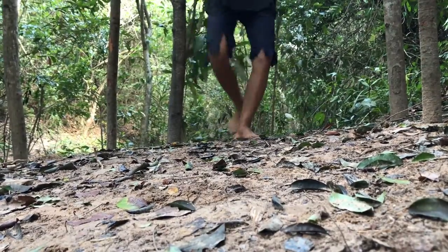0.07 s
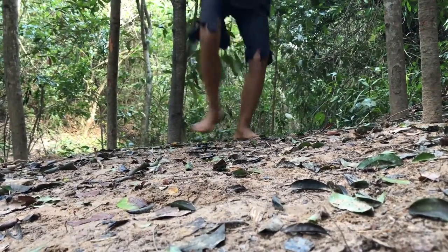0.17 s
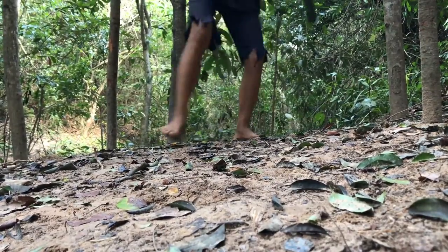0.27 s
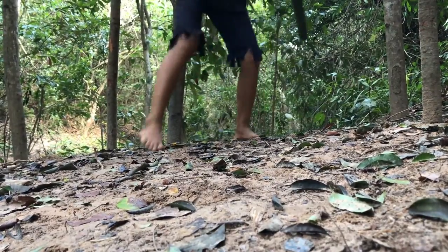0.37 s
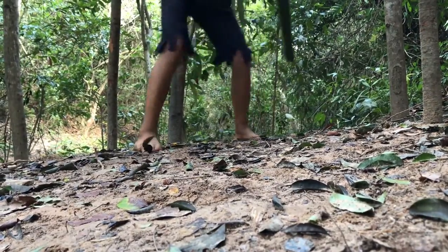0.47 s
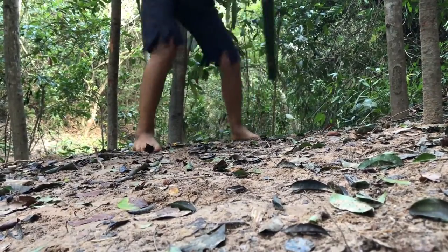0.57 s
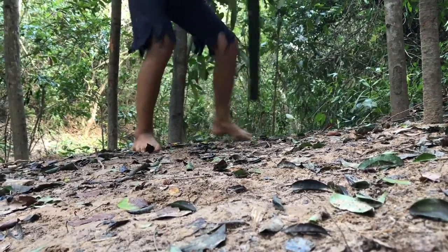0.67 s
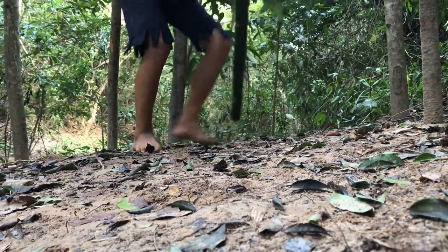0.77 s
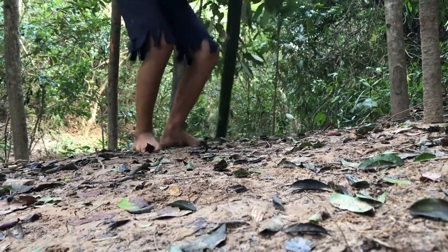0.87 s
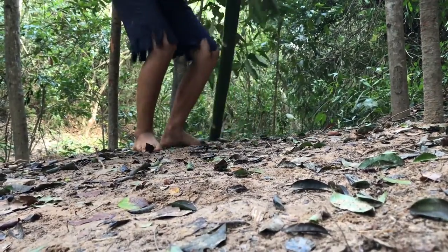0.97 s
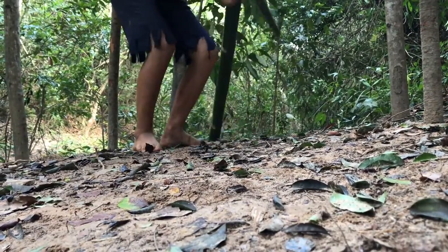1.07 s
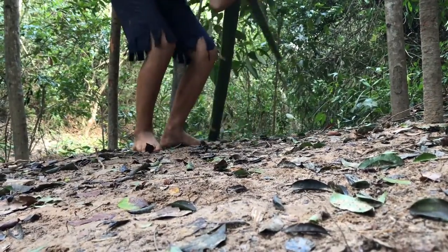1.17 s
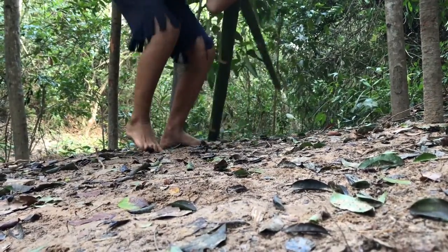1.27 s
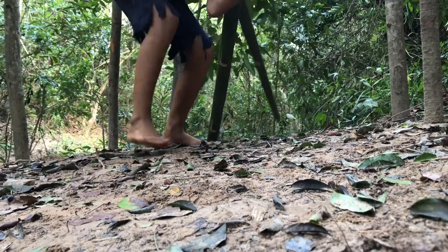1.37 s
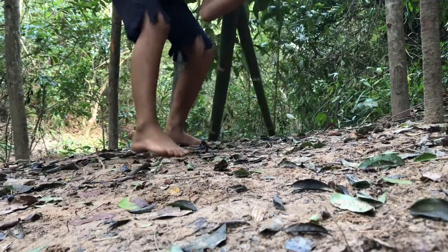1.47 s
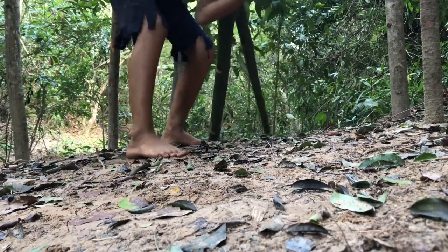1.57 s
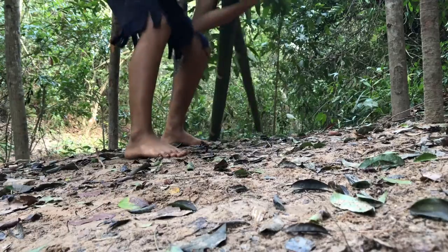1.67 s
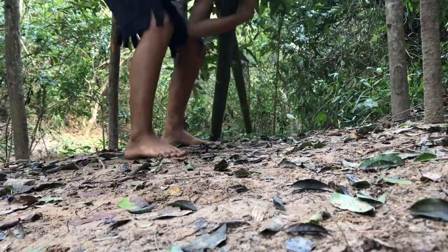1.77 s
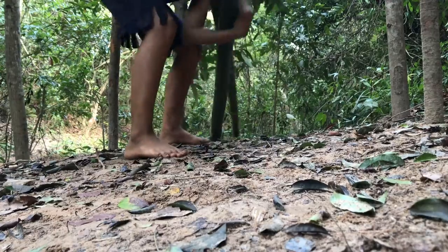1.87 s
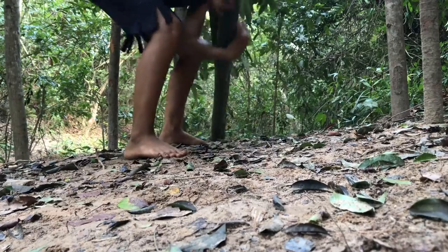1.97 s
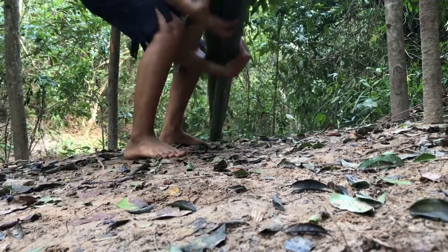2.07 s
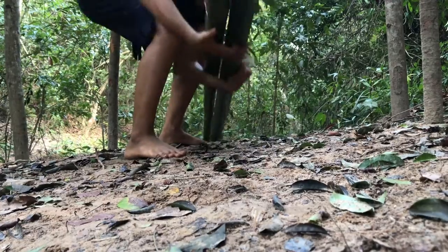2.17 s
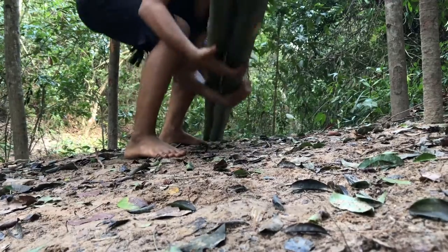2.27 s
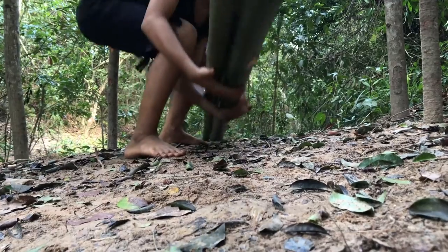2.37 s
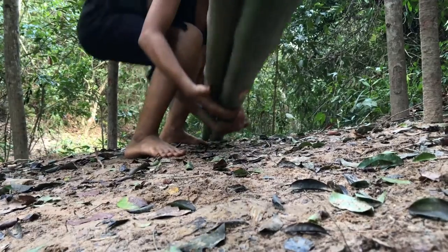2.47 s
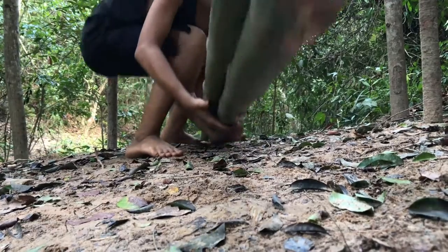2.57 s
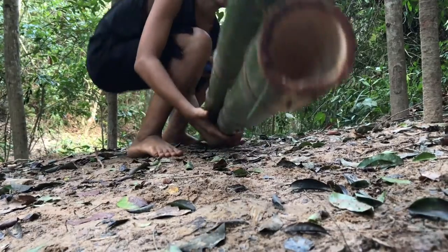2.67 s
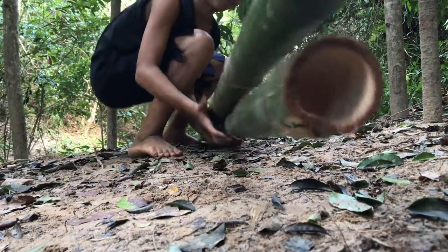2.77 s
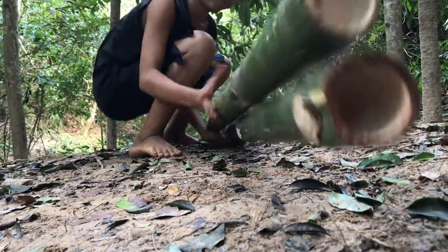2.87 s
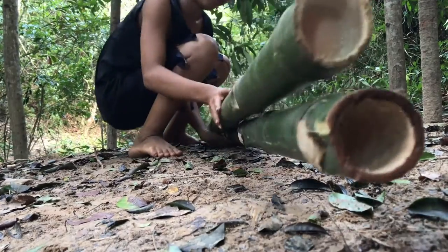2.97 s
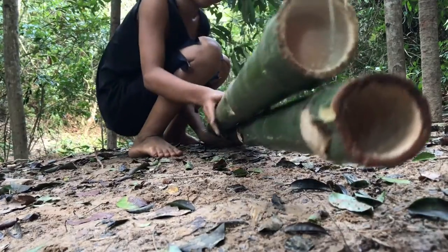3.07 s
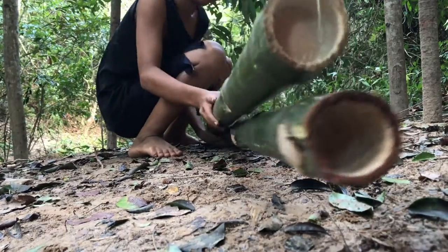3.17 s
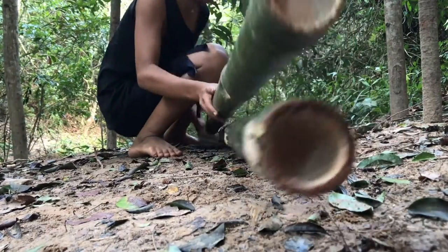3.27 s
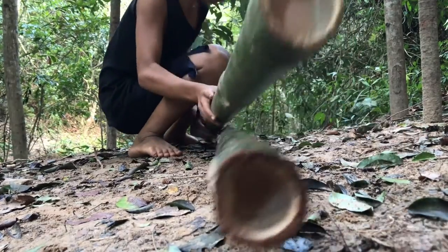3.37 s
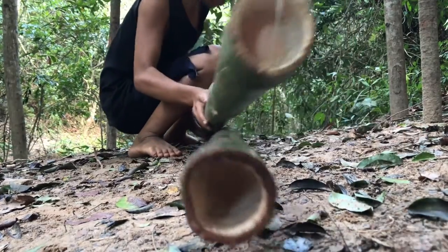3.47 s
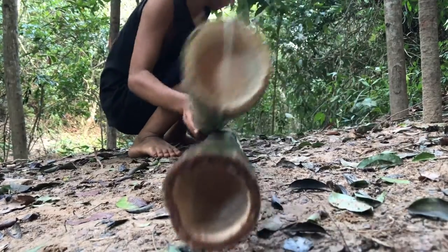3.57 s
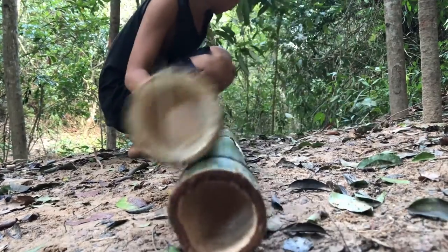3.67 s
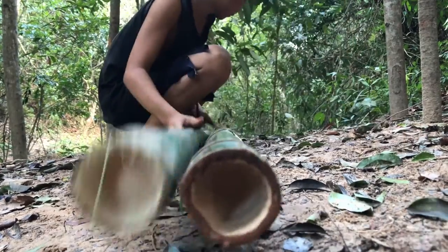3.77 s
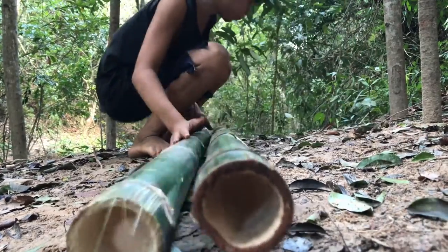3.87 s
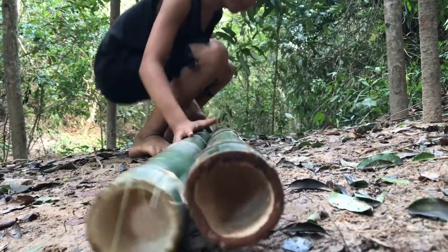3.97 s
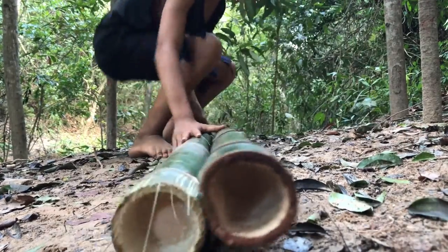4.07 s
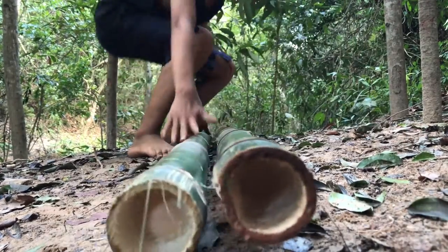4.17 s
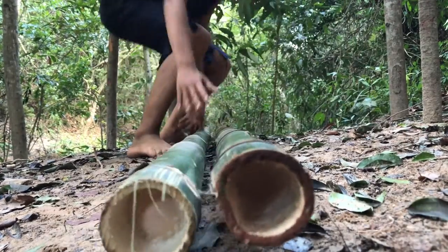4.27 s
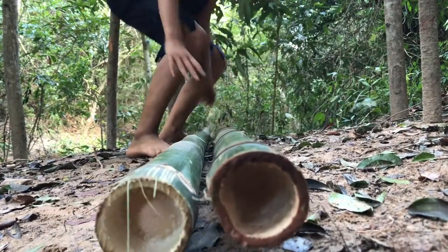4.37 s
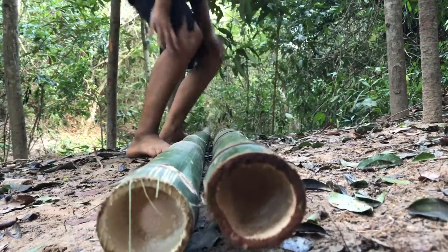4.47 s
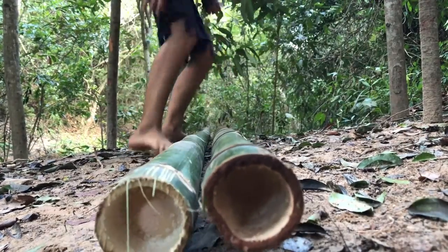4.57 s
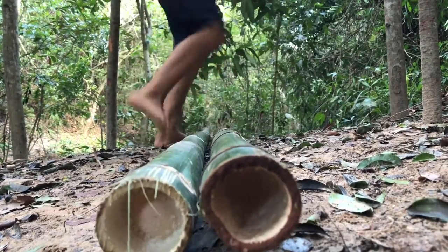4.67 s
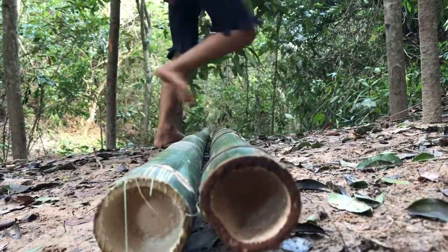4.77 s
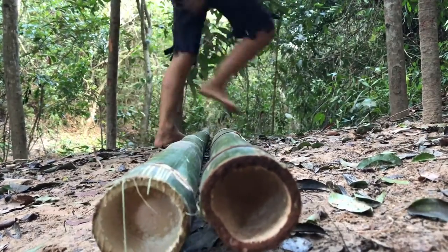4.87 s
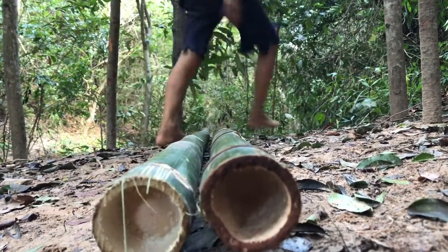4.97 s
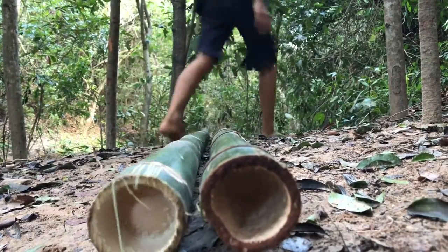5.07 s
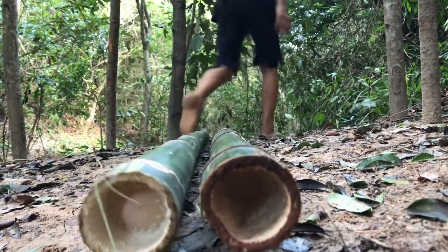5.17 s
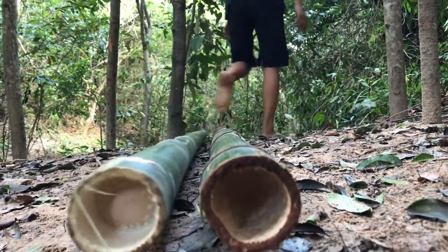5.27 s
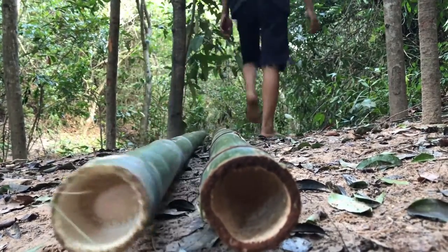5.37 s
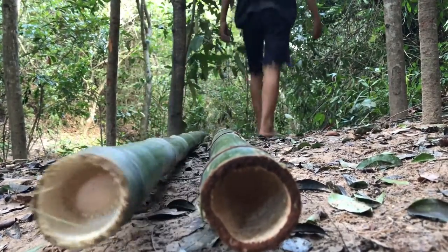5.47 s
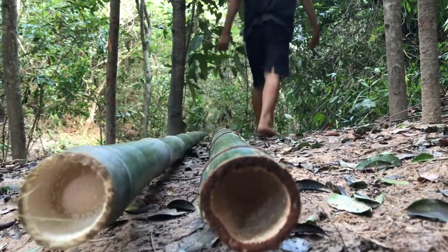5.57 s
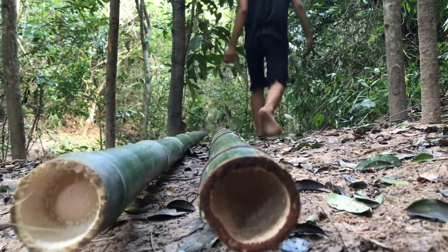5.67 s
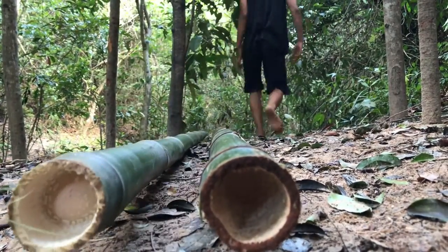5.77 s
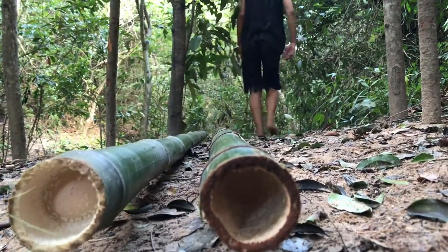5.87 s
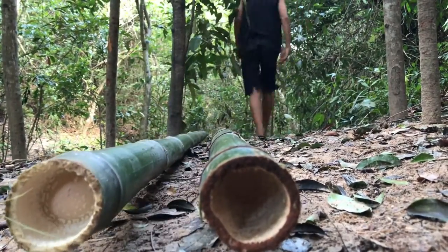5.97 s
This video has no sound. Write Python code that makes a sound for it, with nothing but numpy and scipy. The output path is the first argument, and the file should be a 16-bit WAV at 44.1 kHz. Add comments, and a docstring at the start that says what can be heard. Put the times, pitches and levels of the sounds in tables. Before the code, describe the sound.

Barefoot steps in dry leaves, two sharp ringing bamboo clacks, a deep hollow boom, then softer knocks as the poles are laid down outdoors.

```python
"""Leafy forest ground: two thick green bamboo poles are gathered and laid down, close by.
They clack, boom hollowly and settle with lighter knocks, as modal resonators with a humming open mouth.
Rolls are runs of small contacts on the same modes; skins slip with dry ticks, made of noise cracks.
Bare feet thud as damped low tones or low noise and shuffle, with leaves that crackle and snap.
Filtered noise gives a low rumble of air and a steady high hiss."""
import sys
import numpy as np
from scipy import signal
from scipy.fft import rfft, irfft, next_fast_len
from scipy.io import wavfile
from scipy.ndimage import uniform_filter1d

SR = 44100
rng = np.random.default_rng(int(sys.argv[2]) if len(sys.argv) > 2 else 0)


def materialize(psi):
    """Save the field psi as 16-bit PCM at rate SR to the path in sys.argv[1].

    A 1-D psi becomes a single channel; in a 2-D psi each row is a channel.
    """
    bounded = np.clip(np.atleast_2d(psi).T, -1, 1)
    quanta = np.round(bounded * 32767).astype(np.int16)
    wavfile.write(sys.argv[1], SR, quanta)


N = 265129
TIME = np.arange(N) / SR
AGE = np.arange(SR // 2) / SR   # time since the onset of a single sound [s]
CUTOFF_HZ = 15700
ON_WALL, ON_SOIL = 0, 1   # where a pole is struck


def from_db(db):
    """Decibel law: level to amplitude gain."""
    return 10 ** (np.asarray(db) / 20)


def rms_one(x):
    """Power normalisation: scale to unit rms."""
    return x / np.sqrt(np.mean(x ** 2) + 1e-20)


def in_time(rows):
    """Linear interpolation: each column of a curve at every sample."""
    s, *columns = np.transpose(rows)
    return [np.interp(TIME, s, column) for column in columns]


def add(track, s, sound):
    """Superposition: mix a sound in from second s."""
    at = max(round(s * SR), 0)
    track[at:at + len(sound)] += sound[:N - at]


def fade(t60):
    """Exponential decay: 60 dB of loss in t60 seconds."""
    return from_db(-60 * AGE / t60)


def ring(hz, t60):
    """Damped oscillator: one struck mode."""
    return np.sin(2 * np.pi * hz * AGE) * fade(t60)


def band(x, low, high, order=3):
    """Causal Butterworth band-pass."""
    sos = signal.butter(order, [low, min(high, .45 * SR)], "band", fs=SR, output="sos")
    return signal.sosfilt(sos, x + 1e-18)


def log_bins(size):
    """Logarithmic frequency axis of a real spectrum."""
    return np.log(np.arange(size // 2 + 1) * SR / size + 1)


def coloured(x, spectrum):
    """Spectral shaping: multiply a steady sound by a spectrum; rms 1."""
    hz, db = np.transpose(spectrum)
    size = next_fast_len(N)
    curve_db = np.interp(log_bins(size), np.log(hz), db, left=-80, right=-80)
    return rms_one(irfft(rfft(x, size) * from_db(curve_db), size)[:N])


def drift(rate, time=TIME):
    """Random modulation: straight lines between normal knots, rate of them per second."""
    knots = rng.standard_normal(4000)
    return np.interp(time * rate, np.arange(len(knots)), knots)


def burst(t60):
    """Decaying noise of unit energy."""
    noise = rng.standard_normal(len(AGE)) * fade(t60)
    return noise / np.linalg.norm(noise)


def crackle(per_s, clump_db, size_db=0.5):
    """Random impulse process: tiny cracks, slightly uneven in size, stronger and weaker in clumps."""
    sizes = rng.choice([-1, 1], N) * from_db(size_db * np.minimum(rng.exponential(1, N), 5))
    return (rng.random(N) < per_s / SR) * sizes * from_db(clump_db * drift(90))


# Spectrum of the air rumble, before its low cut: (frequency [Hz], relative level [dB])
AIR_SPECTRUM = [(25, -12), (38, -6), (59, 4), (133, -5.5), (253, -13), (435, -20), (981, -24.5),
                (7570, -42.5), (9000, -32.5), (11700, -39), (19800, -120)]
# Spectrum of the high hiss: (frequency [Hz], relative level [dB])
HISS_SPECTRUM = [(8000, -19), (10400, -11), (11400, 3), (13200, 7.5), (14300, 2), (15200, -13),
                 (16000, -31)]


def background(air_db=-50.5, hiss_db=-60, swell_db=0.5, low_cut_hz=38):
    """Stationary noise: gently swelling air under an even high hiss."""
    air = coloured(rng.standard_normal(N), AIR_SPECTRUM)
    air = band(air, low_cut_hz, CUTOFF_HZ, order=2) * from_db(swell_db * drift(9))
    hiss = coloured(rng.standard_normal(N), HISS_SPECTRUM)
    return from_db(air_db) * air + from_db(hiss_db) * hiss


def scraping(full_scale_db=-31.5, follows=0.85, rise_s=0.035, t60=0.33):
    """Sliding friction: strength of the scrape after each contact, as the pole grinds to rest."""
    power = np.zeros(N)
    for s, db, *_ in contacts():
        # the scrape follows only a share of the blow's decibels
        strength = from_db(full_scale_db + follows * db) * fade(t60) * (1 - fade(rise_s))
        add(power, s, strength ** 2)
    return np.sqrt(power)


# Strength of shuffling, before trims: (time [s], rubbing level [dB], leaf level [dB])
SHUFFLE_CURVE = [(0.0, -55, -55), (1.52, -59, -61.5), (1.64, -56, -55), (2.09, -59.5, -59),
                 (2.49, -56.5, -63), (3.23, -53, -60.5), (3.53, -55, -67), (3.99, -53, -55),
                 (4.29, -67, -67.5), (5.82, -58.5, -64.5), (6.0, -57, -66)]
# Spectrum of rubbing on soil: (frequency [Hz], relative level [dB])
RUB_SPECTRUM = [(150, 6), (300, 1.5), (550, 1.5), (1100, -4.5), (1800, -6), (3000, -12), (6000, -26)]
# Spectrum of stirred leaves: (frequency [Hz], relative level [dB])
LEAF_SPECTRUM = [(900, 8.5), (1800, -6.5), (3300, 1.5), (5000, -3.5), (7000, -3.5), (10000, -11.5),
                 (15000, -1)]


def shuffle(rub_trim_db=-3, leaf_trim_db=-2, uneven_db=5.0, stirred_db=-16):
    """Friction noise: feet and pole ends rub over the soil and stir the litter."""
    rub_db, leaf_db = in_time(SHUFFLE_CURVE)
    scrape = scraping()
    leaves = coloured(crackle(per_s=5600, clump_db=2.0), LEAF_SPECTRUM)
    soil = coloured(rng.standard_normal(N) * from_db(uneven_db * drift(45)), RUB_SPECTRUM)
    # independent sources add in power
    leaf_gain = np.hypot(from_db(leaf_db + leaf_trim_db), from_db(stirred_db) * scrape)
    rub_gain = np.hypot(from_db(rub_db + rub_trim_db), scrape)
    return leaf_gain * leaves + rub_gain * soil


def crack_runs(rows, trim_db=-7.0, rise_s=0.0012, ragged_db=0.5, width=1.48, cracks_per_s=2500):
    """Random impulse excitation: short, ragged runs of tiny cracks, each band-passed around its own pitch."""
    out = np.zeros(N)
    for s, db, hz, t60 in rows:
        cracks = rng.random(len(AGE)) < cracks_per_s / SR
        run = cracks * burst(t60) * from_db(ragged_db * drift(500, AGE)) * (1 - fade(rise_s))
        sound = band(run, hz / width, hz * width, order=2)
        peak = np.sqrt(uniform_filter1d(sound ** 2, size=88).max())   # over 2 ms
        add(out, s, from_db(db + trim_db) * sound / peak)
    return out


# Leaf and twig snaps, with a low foot thud at 0.123 s and a low footfall knock at 5.912 s:
# (time [s], level before trim [dB], pitch [Hz], t60 [s])
SNAPS_AND_STEPS = [(0.018, -40.5, 6000, 0.36), (0.123, -37.5, 443, .05), (0.7116, -39.5, 4340, 0.051),
                   (0.867, -38.5, 2900, 0.1), (0.9113, -37.5, 1830, 0.032), (0.985, -30.5, 1420, 0.089),
                   (1.007, -41, 2700, 0.06), (5.75, -45.5, 2860, 0.044), (5.912, -42, 620, 0.13),
                   (5.915, -42.5, 3320, 0.066)]


def snaps_and_steps():
    """Band-limited impulse noise: high runs snap as leaves and twigs, two low ones knock as footfalls."""
    return crack_runs(SNAPS_AND_STEPS)


# A foot or a pole pushes through the leaves: (middle time [s], level [dB], half length [s])
LEAF_PUSHES = [(.46, -62, 0.1), (1.015, -45.5, 0.013), (1.223, -55.5, 0.055), (1.57, -53.5, 0.036),
               (2.295, -52.5, 0.0082), (2.87, -55, 0.1), (3.329, -52, 0.047), (5.148, -54, 0.023)]
# Spectrum of crushed leaves: (frequency [Hz], relative level [dB])
CRUNCH_SPECTRUM = [(800, 5), (1400, 4), (3200, 6), (5000, -1), (8000, -2.5), (11000, -3.5), (13500, 4),
                   (15500, -7)]


def rustles(crush_db=-25, crush_s=0.029):
    """Crushing under pressure: each push into the leaves, or pole landing on them, swells and dies away."""
    # a landing crushes leaves at crush_db against its own level
    crushes = [(s, db + crush_db, crush_s) for s, db, _, _ in LANDING_BLOWS]
    pushes = list(LEAF_PUSHES) + crushes
    pressure = sum(from_db(db) * np.exp(-.5 * ((TIME - s) / half) ** 2) for s, db, half in pushes)
    return pressure * coloured(crackle(per_s=2000, clump_db=3.5), CRUNCH_SPECTRUM)


# Dull thumps on the soil: (time [s], level before the slow onset [dB], frequency [Hz], t60 [s])
SOIL_THUMPS = [(0.922, -18.5, 94, 0.054), (1.219, -37.5, 76.4, 0.12), (1.646, -38, 86.5, 0.24),
               (3.907, -31, 84, 0.13)]


def thumps(rise_s=0.014):
    """Heavily damped oscillation: soft soil yields slowly and soon stops swinging."""
    out = np.zeros(N)
    for s, db, hz, t60 in SOIL_THUMPS:
        add(out, s, from_db(db) * ring(hz, t60) * (1 - fade(rise_s)))
    return out


# Echoes off the ground and trunks: (delay [s], level [dB])
ECHO_PATHS = [(.0063, -22.5), (.0098, -17), (0.0198, -20)]


def forest(x, low_db=-10, low_t60=0.17, high_db=-15.0, high_t60=0.26, split_hz=1700, build_s=0.0044):
    """Reflection and scattering: direct sound, dull echoes, dull scatter and a longer broadband tail."""
    paths = np.zeros(len(AGE))
    for delay, db in ECHO_PATHS:
        add(paths, delay, from_db([db]))
    scatter = from_db(low_db) * burst(low_t60) * (1 - fade(build_s))
    paths = band(paths + scatter, 53, split_hz, order=2)
    paths += from_db(high_db) * burst(high_t60)
    return x + signal.fftconvolve(x, paths)[:len(x)]


# Air chambers and wall of a pole, before chance variation:
# (frequency [Hz], level struck on the wall [dB], level set on the soil [dB], t60 [s])
POLE_MODES = [(176.3, -20.5, -14, .33), (282, -12.5, -11, 0.21), (375, -12, -8.5, 0.25),
              (489.4, 1, -9, .21), (515, -3, 4, 0.061), (572, -6.5, -6, 0.19), (732, -7.5, -15.5, .12),
              (824, -41, -12.5, 0.079), (927, -20, -21, 0.2), (1020, -17.5, -10.5, 0.17),
              (1094, -15, -15.5, 0.094), (1181, -25, -24, 0.1), (1321, -12.5, -12, 0.11),
              (1380, -17, -18, 0.057), (1538, -8.5, -29, 0.059), (1966, -16, -11.5, 0.095)]


def pole_modes(place, vary_db=1.5, detune=0.0081, flutter_db=3.5, flutter_per_s=110):
    """Modal superposition: place and grip set the mode strengths; the ring flutters as the pole rocks."""
    strengths, shifts = rng.standard_normal((2, len(POLE_MODES)))
    modes = np.zeros(len(AGE))
    for (hz, *levels_db, t60), own, shift in zip(POLE_MODES, strengths, shifts):
        # the grip detunes mostly the higher modes, those of the wall
        shifted_hz = hz * (1 + detune * shift * min(hz / 1000, 2) ** 2)
        modes += from_db(levels_db[place] + vary_db * own) * ring(shifted_hz, t60)
    return modes * from_db(flutter_db * drift(flutter_per_s, AGE))


# Edges of the thud, hollow, wall, clack and tick registers: frequency [Hz]
REGISTER_EDGES = [120, 330, 680, 1900, 4800, 15000]


def weighted(x, levels_db):
    """Minimum-phase equalisation: bring each register of a blow toward its level."""
    edges, size = np.array(REGISTER_EDGES), len(x)
    power = []
    for low, high in zip(edges, edges[1:]):
        onset = band(x[:size // 8], low, high, order=2)
        power.append(uniform_filter1d(onset ** 2, size=441).max())   # over 10 ms
    centres = np.sqrt(edges[:-1] * edges[1:])
    gain_db = np.interp(log_bins(size), np.log(centres), levels_db - 10 * np.log10(power))
    cepstrum = irfft(np.log(from_db(gain_db)), size)
    # fold the cepstrum onto its causal half: nothing sounds before the contact
    cepstrum[1:] *= 2
    cepstrum[size // 2:] = 0
    return irfft(rfft(x) * np.exp(rfft(cepstrum)), size)


# Broad resonances of the hard skin, before register weights: (frequency [Hz], level [dB], t60 [s])
SKIN_MODES = [(2980, 1.5, 0.0026), (3770, 1.5, 0.0026), (6800, 7, 0.0018), (12500, -22, 0.0012)]


def knock(levels_db, spot_hz, place, ring_db, spot_db=1, spot_t60=0.017, crack_db=17, crack_t60=0.017,
          fibre_db=19, fibre_t60=0.041, fibre_hz=2800, lowest_hz=130):
    """Impact excitation: modes, struck spot and a brief crack, weighted by register for the contact."""
    body = from_db(ring_db) * pole_modes(place) + from_db(spot_db) * ring(spot_hz, spot_t60)
    body += sum(from_db(db) * ring(hz, t60) for hz, db, t60 in SKIN_MODES)
    body += from_db(crack_db) * burst(crack_t60)
    # the wall's many damped modes blur into a short noise
    body += from_db(fibre_db) * band(burst(fibre_t60), 150, fibre_hz, order=1)
    return weighted(band(forest(body), lowest_hz, REGISTER_EDGES[-1]), levels_db)


def unfold(blows, place, stages):
    """Multiple impact: each blow as contacts (s, dB, register weights dB, spot Hz, place struck)."""
    from_wall = np.arange(-2, 3)   # registers below or above the wall register
    return [(s + delay, db + change, np.array(weights) + brightness * from_wall, spot_hz, place)
            for s, db, brightness, spot_hz in blows for (delay, change), weights in stages]


# Stages of a blow: (delay [s], level against the blow [dB])
FIRST = (0, 0)
GRAZE = (-.0035, -17)   # a light blow grazes just before it seats

# Weight of a rap in the thud, hollow, wall, clack and tick registers: level against the peak [dB]
RAP_WEIGHTS = (-8.5, -19, -3, -14, -25)
# A pole glances off the other, or off a twig as it rolls, before register trims:
# (time [s], level [dB], brightness [dB per register], struck spot [Hz])
RAP_BLOWS = [(1.29, -40.5, 3, 1110), (1.473, -34, -1.5, 980), (1.525, -25.5, 0.5, 1310),
             (1.563, -29, 0.5, 1170), (1.742, -29, -1, 980), (1.841, -39, -3.5, 1300),
             (2.254, -27.5, -3, 574), (2.791, -25, -0.5, 1660), (5.142, -40.5, 0, 1260)]


def raps():
    """Glancing impact: a rap grazes, seats, then slips and catches again."""
    chatter = (0.0065, -13.5)
    return unfold(RAP_BLOWS, ON_WALL, [(GRAZE, RAP_WEIGHTS), (FIRST, RAP_WEIGHTS), (chatter, RAP_WEIGHTS)])


# Weights of the clack and of the wall swing in the five registers: level against the peak [dB]
CLACK_WEIGHTS = (-22, -29, -17.5, -12, -15.5)
SWING_WEIGHTS = (-19.5, -15, -1.5, -17.5, -43)
# The upright poles swing hard into each other, before register trims:
# (time [s], level [dB], brightness [dB per register], struck spot [Hz])
CLASH_BLOWS = [(1.642, -7.5, 0.5, 1063), (1.7107, -9, 0, 1200)]


def clashes():
    """Hard collision: after the clack the walls swing out, and the poles touch once more."""
    wall_swing, rattle = (.006, -7), (.023, -16)
    stages = [(FIRST, CLACK_WEIGHTS), (wall_swing, SWING_WEIGHTS), (rattle, RAP_WEIGHTS)]
    return unfold(CLASH_BLOWS, ON_WALL, stages)


# Weights of soil contact, boom and rebound in the five registers: level against the peak [dB]
SOIL_WEIGHTS = (-5, -9.5, -5, -22.5, -29.5)
BOOM_WEIGHTS = (-18.5, -2.5, -11.5, -23.5, -54)
REBOUND_WEIGHTS = (-16.5, -32, -9.5, -31.5, -45)
# The butt of a pole is set down and its chambers boom, before register trims:
# (time [s], level [dB], brightness [dB per register], struck spot [Hz])
BOOM_BLOWS = [(2.074, -7.5, 1, 953), (2.336, -21, 0, 984)]


def booms():
    """Cavity resonance: the butt meets leaf litter, then firm soil, and bounces once."""
    cushion, bounce = (-0.0049, -20.5), (.0125, -1.4)
    stages = [(cushion, SOIL_WEIGHTS), (FIRST, BOOM_WEIGHTS), (bounce, REBOUND_WEIGHTS)]
    return unfold(BOOM_BLOWS, ON_SOIL, stages)


# A pole drops along its length and settles, before register trims:
# (time [s], level [dB], brightness [dB per register], struck spot [Hz])
LANDING_BLOWS = [(3.48, -34.5, 3.5, 960), (3.745, -28, 1.5, 580), (3.946, -29.5, -3, 1050),
                 (4.093, -26.5, -1, 920)]


def landings():
    """Damped impact: a dropped pole grazes, lands and rocks down onto its other end."""
    settle = (.015, -9)
    return unfold(LANDING_BLOWS, ON_SOIL, [(GRAZE, SOIL_WEIGHTS), (FIRST, SOIL_WEIGHTS), (settle, SOIL_WEIGHTS)])


# Weight of a click in the five registers: level against the peak [dB]
CLICK_WEIGHTS = (-50, -50, -12, -2.5, -15.5)
# The lying poles click together, skin on skin, before register trims:
# (time [s], level [dB], brightness [dB per register], struck spot [Hz])
CLICK_BLOWS = [(3.890, -22, 0, 1006)]


def clicks():
    """Stiff contact: skin grazes skin, then seats."""
    return unfold(CLICK_BLOWS, ON_WALL, [(GRAZE, CLICK_WEIGHTS), (FIRST, CLICK_WEIGHTS)])


def contacts():
    """Superposition of impacts: the contacts of every kind of blow."""
    return raps() + clashes() + booms() + landings() + clicks()


# As the poles come down their open mouths hum more strongly; the wall's ring varies from blow to blow:
# (time [s], mouth level against the hollow register [dB], modal ring level [dB], mouth frequency [Hz])
LOWERING_CURVE = [(1.72, -34, -5.5, 378), (2.34, -45, -17, 379.6), (2.8, -5, -10.5, 368),
                  (3.6, -16, 8, 374), (3.76, -4.5, -8, 384), (3.95, -8, -13, 382),
                  (4.1, -5.5, -12.5, 371.5)]


def poles(register_trim_db=(-2, -.2, -1.6, -2.2, -2.5), mouth_t60=0.52, waver_db=5.0, waver_per_s=45):
    """Coupled resonators: every knock also sets the air in the open end into a wavering hum."""
    out = np.zeros(N)
    mouth_db, ring_db, mouth_hz = in_time(LOWERING_CURVE)
    for s, db, weights, spot_hz, place in contacts():
        at = round(s * SR)
        add(out, s, knock(db + weights + register_trim_db, spot_hz, place, ring_db[at]))
        waver = from_db(waver_db * drift(waver_per_s, AGE))
        hum = ring(mouth_hz[at], mouth_t60) * waver
        add(out, s, from_db(db + weights[1] + mouth_db[at]) * hum)   # weights[1]: hollow register
    return out


# Thin pings: (time [s], level [dB], frequency [Hz], t60 [s])
THIN_PINGS = [(1.291, -41, 3410, 0.033), (3.082, -45, 2640, 0.033)]


def pings():
    """Single-mode decay: a thin, short ring."""
    out = np.zeros(N)
    for s, db, hz, t60 in THIN_PINGS:
        add(out, s, from_db(db) * ring(hz, t60))
    return out


# Skin slips on skin with a dry tick: (time [s], level before trim [dB], pitch [Hz], t60 [s])
SKIN_SLIPS = [(1.669, -32, 3900, 0.023), (1.7195, -23, 3540, 0.0093), (1.731, -33, 3900, 0.015),
              (1.769, -37, 2810, 0.05), (1.84, -38, 3480, 0.011), (2.196, -42, 3480, 0.075),
              (2.214, -45, 5500, 0.033), (2.234, -43, 5300, 0.027), (2.25, -35, 3980, 0.053),
              (2.791, -40, 2520, 0.013), (4.094, -35, 2090, 0.021)]


def skin_slips():
    """Stick-slip friction: skin lets go of skin in runs of cracks."""
    return crack_runs(SKIN_SLIPS)


# A pole rolls or drags in a run of small, soft contacts:
# (middle time [s], level [dB], half length [s], centre frequency [Hz])
ROLL_RUNS = [(1.864, -46, 0.019, 514), (2.135, -50.5, 0.022, 1900), (2.144, -44, 0.011, 940),
             (2.233, -42.5, .011, 900), (2.26, -35, .01, 483), (2.35, -36, .008, 617),
             (2.809, -43.5, 0.018, 333), (2.929, -52.5, 0.0061, 3150), (3.009, -45, 0.011, 1060),
             (3.012, -45, 0.017, 294), (2.946, -44.5, .004, 910), (3.189, -52.5, .035, 2400),
             (3.328, -52.5, .022, 2980), (3.505, -46.5, 0.016, 250), (3.638, -45, 0.015, 312),
             (3.757, -39.5, 0.0054, 503), (3.965, -39.5, 0.013, 1100), (3.974, -38.5, 0.015, 280),
             (4.112, -38, 0.011, 696)]


def rolls(contacts_per_s=700, width=1.36, damped_t60=0.12, fibre_db=25, fibre_t60=0.016):
    """Rolling contact: small touches swell and fade, exciting pole modes damped by what it rolls on."""
    out = np.zeros(N)
    for s, db, half, hz in ROLL_RUNS:
        pressure = np.exp(-.5 * (AGE / half - 3) ** 2)   # peaks three half lengths in
        touches = (rng.random(len(AGE)) < contacts_per_s / SR) * rng.standard_normal(len(AGE)) * pressure
        body = pole_modes(ON_SOIL) * fade(damped_t60) + from_db(fibre_db) * burst(fibre_t60)
        sound = signal.fftconvolve(touches, body)[:len(AGE)]
        sound = band(sound, hz / width, hz * width, order=2)
        peak = np.sqrt(uniform_filter1d(sound ** 2, size=441).max())   # over 10 ms
        add(out, s - 3 * half, from_db(db) * sound / peak)
    return out


def scene():
    """Linear superposition of all sources in one channel."""
    ground = background() + shuffle() + snaps_and_steps() + rustles() + thumps()
    bamboo = poles() + pings() + skin_slips() + rolls()
    return (ground + bamboo)[None]


def record(dry):
    """Band limiting: a steep elliptic low-pass cuts the top."""
    return signal.sosfilt(signal.ellip(10, .1, 80, CUTOFF_HZ, fs=SR, output="sos"), dry)


dry = scene()
out = record(dry)
materialize(out)
```